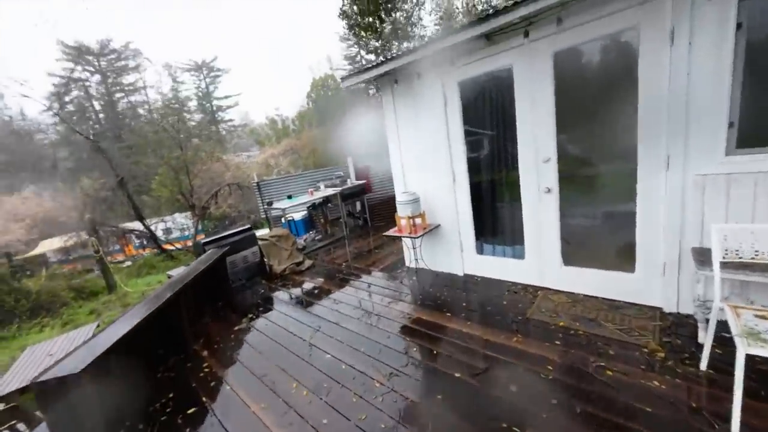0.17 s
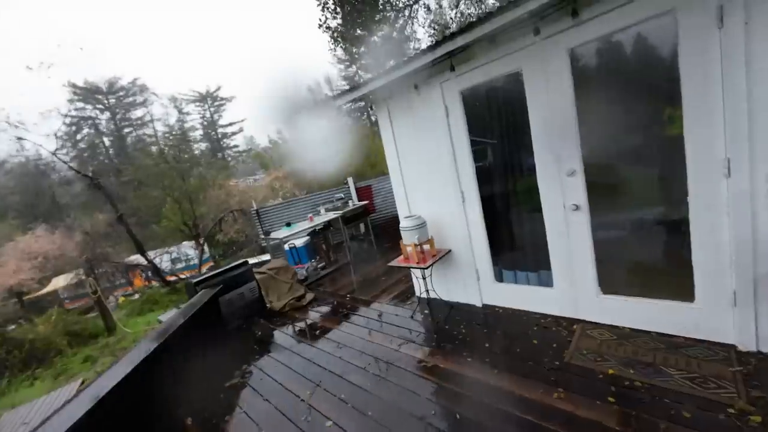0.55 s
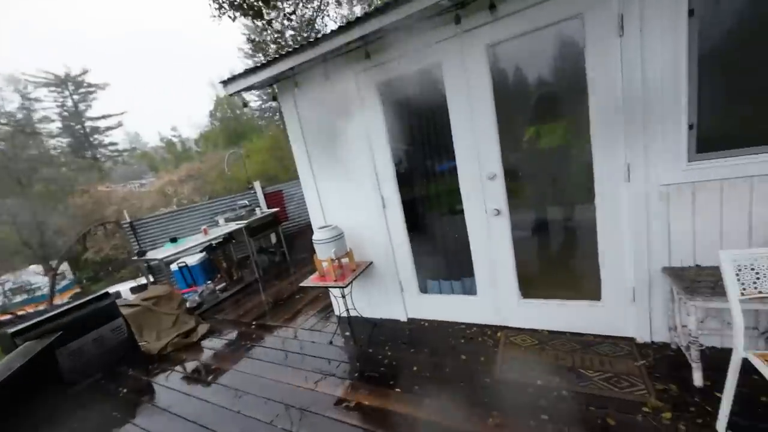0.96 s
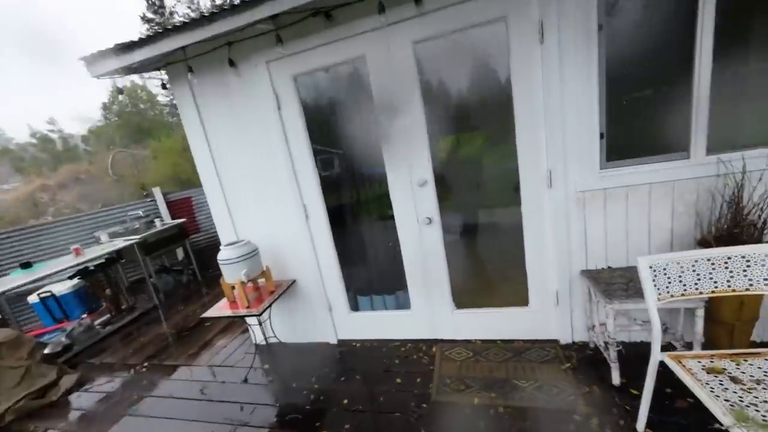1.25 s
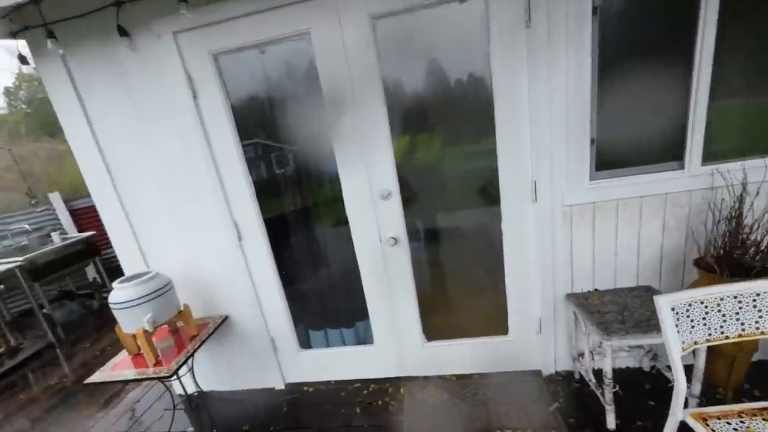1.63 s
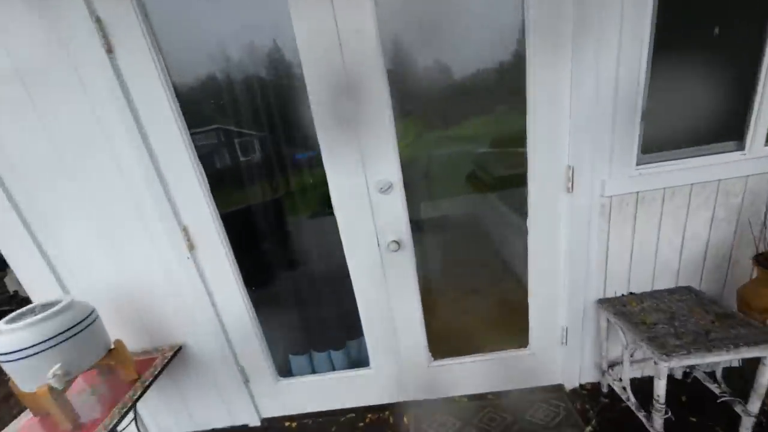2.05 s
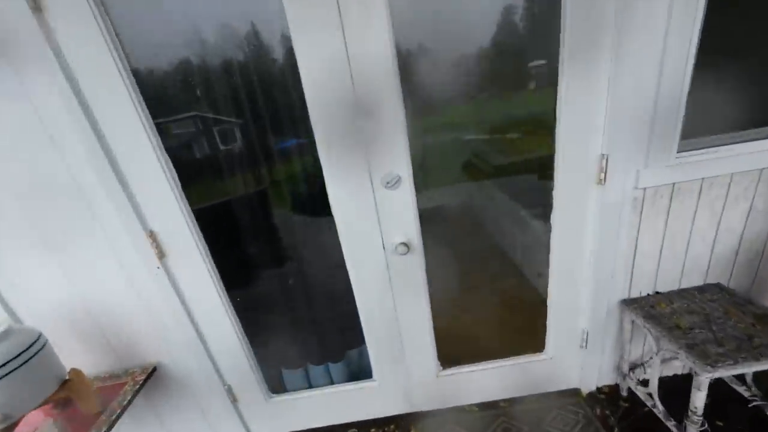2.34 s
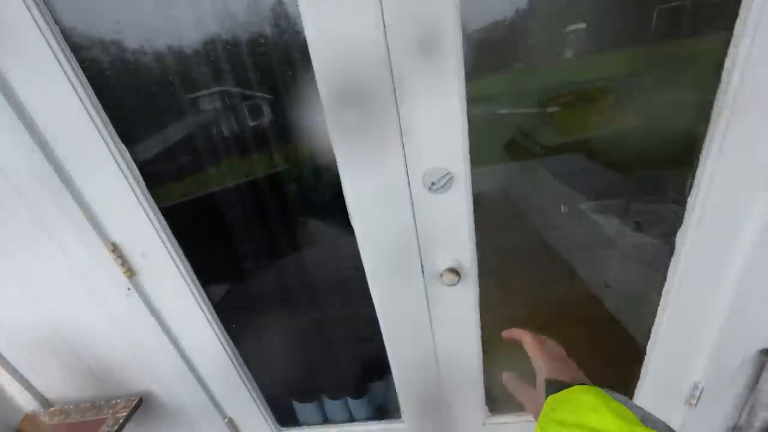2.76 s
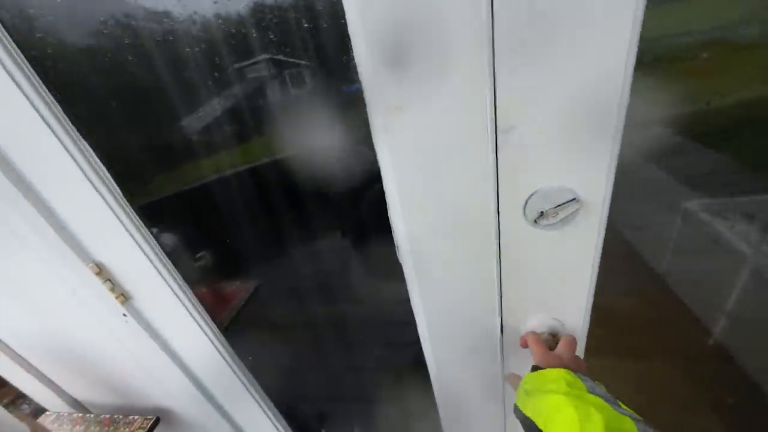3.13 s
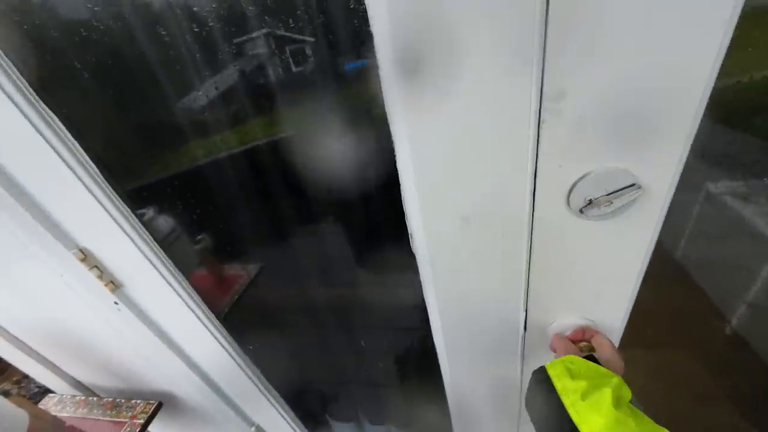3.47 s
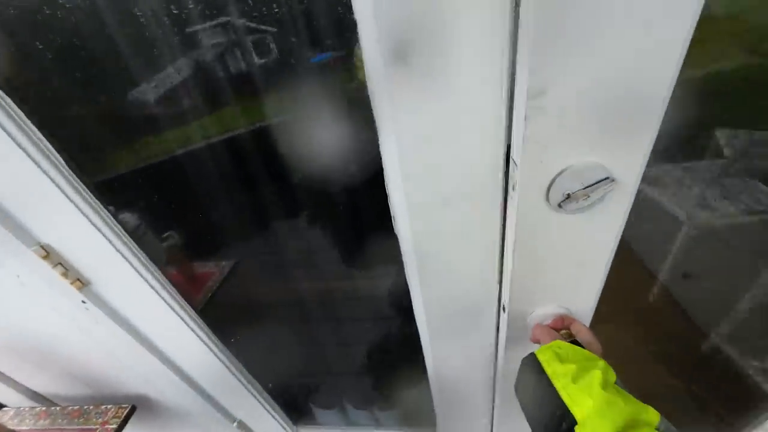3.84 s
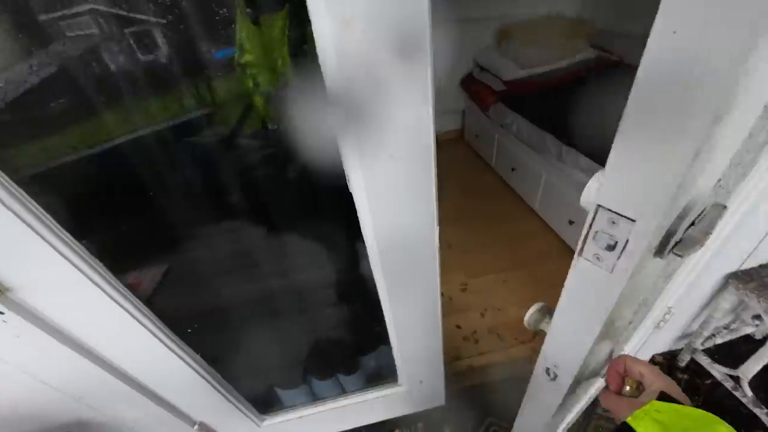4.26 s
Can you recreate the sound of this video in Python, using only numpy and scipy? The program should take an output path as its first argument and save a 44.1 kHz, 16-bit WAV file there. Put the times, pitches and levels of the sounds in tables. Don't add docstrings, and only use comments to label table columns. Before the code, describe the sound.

Rain hiss with a watery, muffled top end fills an open deck, close drops ticking at various pitches. Uneven low footfalls make the planks thud, with soft rubbing of sole and sleeve and gusty rumble on the moving microphone. The walker stops at a door; the latch clicks sharply, then the wood judders in quick slips and thuds as it opens.

```python
import sys
import numpy as np
from scipy import signal
from scipy.fft import rfft, irfft, next_fast_len
from scipy.io import wavfile
from scipy.ndimage import uniform_filter1d, map_coordinates

SR = 44100
rng = np.random.default_rng(int(sys.argv[2]) if len(sys.argv) > 2 else 0)


def wav_record(signal):
    frames = np.transpose(np.atleast_2d(signal))
    bounded = np.clip(frames, -1, 1)
    quanta = np.round(bounded * 32767).astype(np.int16)
    wavfile.write(sys.argv[1], SR, quanta)


def ratio_of_db(decibels):
    return 10 ** (np.asarray(decibels, float) / 20)


N = 194084


def unit(x):
    return x / np.sqrt(np.mean(x ** 2) + 1e-20)


def curves(rows):
    s, *cols = np.transpose(rows)
    return [np.interp(np.arange(N) / SR, s, c, left=-120) for c in cols]


def wobble(rate):
    knots = rng.standard_normal(int(N * rate / SR) + 4)
    return map_coordinates(knots, [np.arange(N) * rate / SR])


def swells(rows):
    t = np.arange(N) / SR
    power = 0
    for s, db, rise, fall in rows:
        power = power + ratio_of_db(2 * db - 20 * np.maximum((s - t) / abs(rise), (t - s) / abs(fall)))
    return np.sqrt(power)


def filtered(x, response):
    m = next_fast_len(N + 8192)
    return irfft(rfft(x, m) * response(np.fft.rfftfreq(m, 1 / SR)), m)[:N]


def coloured(x, spectrum):
    f, db = np.transpose(list(spectrum) + [(SR / 2, -140)])
    return unit(filtered(x, lambda hz: ratio_of_db(np.interp(np.log(hz + 1), np.log(f + 1), db))))


def resonated(x, modes):
    def response(f):
        total = 0
        for k, (centre, width, db) in enumerate(modes):
            band = 1j * f * width
            total = total + (-1) ** k * ratio_of_db(db) * band / (centre * centre - f * f + band)
        return total
    return unit(filtered(x, response))


def patchy(depth_db):
    z = signal.stft(rng.standard_normal(N + 512), nperseg=512)[2]
    field = uniform_filter1d(rng.standard_normal(z.shape), size=7, axis=0)
    field = uniform_filter1d(field, size=6, axis=1)
    return signal.istft(z * ratio_of_db(depth_db * unit(field)), nperseg=512)[1][:N]


def impacts(count, spread_db, life_s):
    at, size = rng.random((count, 2)).T
    energy = ratio_of_db(-2 * spread_db * np.log(1 - size * .995))
    hits = np.bincount((at * N).astype(int), energy, N)
    puff = np.exp(-2 * np.arange(900) / (SR * life_s))
    loudness = np.sqrt(np.abs(signal.fftconvolve(hits, puff)[:N]))
    return unit(loudness * rng.standard_normal(N))


def ring(t, hz, t60, attack):
    return -ratio_of_db(-60 * t / t60) * (1 - np.exp(-t / attack)) * np.sin(2 * np.pi * hz * t)


def add(track, s, sound):
    track[round(s * SR):][:len(sound)] += sound


def rain():
    # t/s, level/dB
    strength = [(0, -51), (.17, -55.5), (.3, -48.5), (.7, -51.5), (.91, -55), (1.2, -51.5), (1.4, -54.5),
                (1.7, -50.5), (2.1, -50.5), (2.45, -50.5), (2.7, -54), (2.9, -52.5), (3.13, -54.5),
                (3.45, -50), (3.7, -60.5), (3.82, -55), (3.99, -57), (4.2, -50.5)]
    # t/s, peak/dB, rise by 10 dB/s, fall by 10 dB/s
    flurries = [(.12, -48, 0.03, 0.09), (.709, -45, 0.08, 0.06), (.78, -48.5, 0.07, 0.17),
                (1.07, -42.5, 0.0982, 0.07), (1.3, -46.5, 0.06, 0.0739), (1.748, -43.5, 0.0473, 0.0148),
                (2.05, -48.5, 0.16, 0.1224), (2.481, -46, 0.0352, 0.02), (2.6, -46, 0.0559, 0.1),
                (2.75, -49.5, 0.04, 0.1), (2.84, -50, -0.02, 0.1), (2.916, -50, 0.09, 0.01),
                (2.99, -47, .03, 0.0445), (3.035, -46.5, .004, 0.0761), (3.165, -45, -0.0051, 0.0748),
                (3.465, -42, 0, 0.0444), (3.518, -43.5, 0.04, 0.0253), (3.71, -48, 0.1, -0.25),
                (4.031, -44.5, -0.0253, -0.04), (3.87, -46.5, 0.018, -0.1641)]
    # f/Hz, level/dB
    patter_tone = [(500, -34), (900, -2), (1600, -5), (2000, -4.5), (2500, -1), (3000, -2), (3400, -1.5),
                   (3800, -5.5), (4500, -6.5), (7000, -4.5), (12500, -4)]
    # f/Hz, level/dB
    board_tone = [(41, -38), (70, 4), (277, -2.5), (346, -3.5), (404, -4), (633, -8.5), (992, -10.5),
                  (2000, -19.5), (2600, -46), (4400, -120)]
    strength_db, = curves(strength)
    near = np.hypot(ratio_of_db(strength_db), swells(flurries))
    grains = 0.765 * patchy(depth_db=2.8) + 0.65 * impacts(count=1600, spread_db=3.0, life_s=0.0014)
    patter = near * ratio_of_db(-3.5 + 0.17 * wobble(25)) * coloured(grains, patter_tone)
    patter = patter + ratio_of_db(-57) * coloured(rng.standard_normal(N), patter_tone)

    drips = 0.81185 * patchy(depth_db=3.0) + 0.548 * impacts(count=350, spread_db=2.0, life_s=0.00642)
    drum = ratio_of_db(-49.5 + 0.29 * (strength_db - strength_db.mean()))
    boom = swells([(N / SR, -47, 0.397, 1)])
    return patter + np.hypot(drum, boom) * ratio_of_db(.8 * wobble(9)) * coloured(drips, board_tone)


def sway():
    # t/s, peak/dB, rise by 10 dB/s, fall by 10 dB/s
    gusts = [(0, -44.5, .05, 0.06), (.23, -40.5, 0.1, 0.1338), (.43, -42.5, 0.11, 0.01),
             (.6, -38.5, 0.09, 0.07), (.95, -45.5, 0.06, 0.04), (1.26, -56.5, 0.66, 0.93),
             (1.33, -37.5, -0.0223, 0.04), (1.5, -53.5, -0.4, 0.4), (2.06, -43, -0.0959, 0.14),
             (2.16, -38, 0.02, 0.21), (2.68, -38, 0.0237, 0.11), (3.22, -47, 0.31, 0.1),
             (3.48, -35.5, 0.0266, 0.1472), (3.7, -44.5, 0.14, 0.15), (3.8, -42.5, -0.0064, 0.06),
             (3.98, -37.5, 0.04, 0.0028), (4.2, -40.5, 0.2339, 0.22), (4.36, -31.5, 0.0246, 0.84)]
    # f/Hz, level/dB
    rumble_tone = [(12, -22), (25, -1.5), (50, -9), (80, -10.5), (140, -54.5)]
    calm_db = -59.5
    rumble = coloured(rng.standard_normal(N), rumble_tone)
    return np.hypot(ratio_of_db(calm_db), swells(gusts)) * unit(ratio_of_db(2.1923 * wobble(8.3)) * rumble)


def dull_knocks():
    # t/s, peak/dB, f/Hz
    knocks = [(.214, -35, 483), (0.2562, -35.5, 1100), (.202, -37, 200.5), (.247, -35.5, 500),
              (0.2552, -29.5, 407), (.261, -30, 300), (.285, -33, 390), (.2922, -24.5, 250),
              (.272, -36, 200), (.316, -37, 200), (0.2977, -28, 380), (.302, -37.5, 299),
              (.307, -27.5, 328), (.382, -37, 360), (.394, -35, 607), (.421, -32.5, 340), (.872, -41, 523),
              (.879, -39.5, 1050), (.887, -43, 600), (.955, -34.5, 220), (2.016, -44, 215),
              (2.128, -34.5, 258), (2.165, -41, 481), (2.175, -37.5, 350), (3.422, -36.5, 523),
              (3.498, -40.5, 580), (.785, -41, 1196), (.882, -43, 1355), (.927, -42, 1100),
              (1.2675, -34, 400), (1.268, -39.5, 947), (1.697, -37, 428), (2.16, -38, 420),
              (2.864, -31, 860), (2.981, -37, 479), (3.033, -38.5, 450), (.836, -39, 240),
              (2.876, -39.5, 502), (2.971, -38.5, 409), (2.997, -38, 520), (3.01, -37.5, 478),
              (3.022, -37.5, 560), (3.306, -45.5, 527.4), (3.366, -40.5, 538), (3.479, -34, 452),
              (3.591, -39, 930), (3.706, -39.5, 469), (3.9948, -40, 1092)]
    knock, t = np.zeros(N + SR), np.arange(SR // 16) / SR
    for s, db, hz in knocks:
        add(knock, s, ratio_of_db(db + 6.0) * ring(t, hz, 0.01153, 0.000727))
    return knock[:N]


def wet_ticks(rows, t60):
    track, t = np.zeros(N + SR), np.arange(SR // 16) / SR
    contact_s = 0.00017
    smack = -ratio_of_db(1) * (1 - t / contact_s) * np.exp(-t / contact_s)
    for s, db, hz in rows:
        smear = 1 + 0.41 * unit(uniform_filter1d(rng.standard_normal(len(t)), size=40))
        spatter = 0.17 * ratio_of_db(-60 * t / (2.2 * t60)) * np.diff(rng.standard_normal(len(t) + 1))
        add(track, s, ratio_of_db(db - 1.5) * (smear * ring(t, hz, t60, .0004) + spatter + smack))
    return track[:N]


def squelches():
    # t/s, peak/dB, f/Hz
    presses = [
        (.216, -42.5, 1250),
        (.2552, -32.5, 1271),
        (.2983, -31.5, 1255),
        (.308, -33.5, 1223),
    ]
    return wet_ticks(presses, t60=0.037)


def steps():
    # t/s, peak/dB, low mode f/Hz, upper mode level/dB, upper mode f/Hz
    footfalls = [(0.2298, -25.5, 103.6, -13.5, 195), (.385, -28, 96.8, -26, 200.9),
                 (1.365, -42, 151, -2.5, 194), (1.501, -37, 163.6, -7.5, 312.7),
                 (1.978, -29.5, 95.2, -5, 270.7), (1.995, -33.5, 110.5, -6, 258),
                 (2.155, -23.5, 101.1, -10.5, 272.2), (2.403, -38.5, 77.9, -20.5, 281),
                 (2.665, -23, 98.4, -11, 214.1), (3.4066, -21.5, 80.5, -4, 238.5),
                 (4.09, -28.5, 85.8, -3.5, 234.4)]
    # t/s, peak/dB, f/Hz, t60/s
    loose_boards = [
        (0.575, -44.5, 79.7, 0.246),
        (0.831, -28, 105.6, 0.1427),
        (0.834, -40, 218, 0.055),
        (0.951, -36.5, 109.9, 0.1124),
        (2.183, -41, 98, 0.25),
        (2.24, -47, 92, 0.6),
        (1.0, -47, 190, .1),
        (3.436, -42, 150, .15),
    ]
    deck, t = np.zeros(N + SR), np.arange(SR // 3) / SR
    stifle = ratio_of_db(-60 * (t / 0.0457) ** 3.05)
    for s, db, low_hz, upper_db, upper_hz in footfalls:
        add(deck, s + 0.00042, ratio_of_db(db + 3.5) * stifle * ring(t, low_hz, 0.309, 0.0065))
        add(deck, s + 0.003845, ratio_of_db(db + upper_db + 3.5) * stifle * ring(t, upper_hz, 0.1325, 0.00161))
    for s, db, hz, t60 in loose_boards:
        add(deck, s, ratio_of_db(db + 7) * ring(t, hz, t60, 0.46 / hz))
    return deck[:N]


def scuffs():
    # t/s, peak/dB, rise by 10 dB/s, fall by 10 dB/s
    scrapes = [(.258, -39, -0.01, .025), (.296, -40, 0.043, 0.0067), (.388, -42.5, 0.0527, 0.0345),
               (.58, -52.5, 0.05, 0.18), (.882, -40.5, -0.013, -0.0262), (.925, -50, -0.1039, 0.03),
               (.96, -50, -0.12, .04), (2.03, -50, 0.194, 0.16), (2.17, -44, -0.048, 0.04),
               (2.94, -47, 0.0276, -0.1), (2.98, -44, 0.0251, -0.0242), (3.01, -43.5, 0.0024, 0.0041),
               (3.44, -45, -0.0318, 0.67)]
    still_s = 3.55
    lateness = np.clip((np.arange(N) / SR - still_s) / .01, -50, 50)
    level = ratio_of_db(-1.5) * swells(scrapes) / (1 + np.exp(lateness))
    grit = impacts(count=1100, spread_db=1.0, life_s=0.00272)
    tone = [(80, -28.0), (150, -0.5), (500, -4.0), (900, -15.5), (1300, -14), (1900, -29.5)]
    return level * coloured(grit, tone)


def near_drops():
    # t/s, peak/dB, f/Hz
    drops = [(.2975, -38, 2440), (.3556, -32, 1610), (.4214, -38.5, 2004), (.4397, -36.5, 3030),
             (.4648, -35.5, 3340), (.7062, -33, 2320), (.956, -36.5, 3276), (1.051, -35.5, 2435),
             (1.0996, -38, 3135), (1.2974, -32.5, 2468), (1.336, -31, 2843), (1.372, -35, 3321),
             (1.476, -36, 2991), (1.5554, -38.5, 3264), (1.698, -37, 3235), (1.7454, -36.5, 3256),
             (2.0506, -35, 3360), (2.163, -37.5, 2056), (1.908, -41.5, 1880), (1.986, -40.5, 1800),
             (2.005, -40, 1780), (2.026, -38.5, 3203), (2.137, -44, 2000), (2.252, -41.5, 2635),
             (2.98, -39, 3020), (3.197, -39.5, 3530), (2.2184, -38.5, 3290), (2.3448, -38.5, 3255),
             (2.5875, -36, 3520), (2.8392, -38.5, 3200), (2.8645, -38, 1720), (2.9145, -36.5, 3296),
             (2.9905, -35.5, 3230), (3.034, -30.5, 2373), (3.061, -34.5, 2680), (3.066, -39, 3496),
             (3.164, -37, 3276), (3.241, -41, 2777), (1.303, -37.5, 1750),
             (3.4625, -33, 3247), (3.4966, -30.5, 2785), (3.515, -38, 2774), (3.582, -40, 3144),
                  (3.7084, -33.5, 1740), (3.8397, -44.5, 2347), (3.8676, -35, 2590), (3.9935, -36.5, 2066),
                  (4.017, -37.5, 3207), (4.068, -40, 2325), (4.1333, -40.5, 2262), (4.189, -43, 2221),
                  (4.2412, -35, 3304), (4.3817, -30.5, 1638), (4.3817, -38.5, 3280), (4.322, -38.5, 2497),
                  (4.357, -42.5, 2500), (4.391, -41, 2780)]
    return wet_ticks(drops, t60=0.013)


def splashes():
    # t/s, splash peak/dB, fine spray level/dB
    bursts = [(0.3815, -56, -72.5), (0.7058, -57, -79), (0.7786, -52, -83), (0.84, -53, -79),
              (0.9562, -58.5, -82), (1.3004, -49.5, -72), (1.3359, -50, -81), (1.3723, -62, -85),
              (1.476, -63, -89), (1.4945, -58, -89), (1.5414, -54.5, -77), (1.5549, -52.5, -85.5),
              (1.7439, -57.5, -79.5), (1.7764, -50, -80.5), (1.9555, -57.5, -85.5), (2.0028, -57, -83),
              (2.0208, -56.5, -85), (2.0497, -52.5, -82), (2.1196, -57.5, -86), (2.2179, -59, -85.5),
              (2.3007, -49.5, -80), (2.377, -57, -83), (2.4994, -64, -78), (2.5264, -61, -77.5),
              (2.5865, -50.5, -73), (2.6579, -60.5, -79), (2.8414, -50.5, -77.5), (2.8584, -60, -81.5),
              (2.9148, -54.5, -79), (2.9547, -57.5, -76.5), (2.9891, -50.5, -83), (3.033, -47, -75.5),
              (3.0604, -61, -85), (3.1961, -58, -86), (3.2365, -56, -82), (3.2904, -60.5, -82.5),
              (3.4057, -58.5, -85.5), (3.458, -54.5, -73), (3.4634, -54, -74.5), (3.5149, -57.5, -86),
              (3.8814, -61.5, -81), (3.9938, -59, -82.5), (4.0153, -54.5, -85), (4.0642, -55.5, -81.5),
              (4.1041, -54.5, -84), (4.1485, -56, -81), (4.1654, -61.5, -80), (4.2154, -57.5, -76.5),
              (4.2854, -58.5, -81.5), (4.3144, -54.5, -88)]
    # f/Hz, level/dB
    splash_tone = [(2500, -30), (4000, -3), (5500, -2), (7000, -1), (9000, -20)]
    # f/Hz, level/dB
    mist_tone = [(5500, -29.5), (7500, -2), (10000, -1.5), (12500, -1.5)]
    (splash, mist), t = np.zeros((2, N + SR)), np.arange(SR // 16) / SR
    for s, db, mist_db in bursts:
        add(splash, s, ratio_of_db(db + 9 - 60 * t / 0.0208) * rng.standard_normal(len(t)))
        add(mist, s, ratio_of_db(mist_db + 38 - 60 * t / 0.036) * rng.standard_normal(len(t)))
    bright = np.std(splash) * coloured(splash[:N], splash_tone)
    return bright + np.std(mist) * coloured(mist[:N], mist_tone)


def latch():
    click, t = np.zeros(N + SR), np.arange(400) / SR
    u = t / 0.000119
    push = u * (1 - 0.3 * u) * np.exp(-u)
    for s, db in [(3.7921, -11.5), (3.7932, -17)]:
        add(click, s, ratio_of_db(db) * (0.07 * ring(t, 2690, 0.0087, 0.0001837) - push))
    return click[:N]


def door():
    # t/s, level/dB
    pull = [
        (4.055, -64),
        (4.07, -46.5),
        (4.094, -48.5),
        (4.184, -42),
        (4.252, -29),
        (4.264, -27.5),
        (4.304, -44),
        (4.4, -40),
    ]
    # f/Hz, width/Hz, level/dB
    panel = [(263, 22, -5), (420, 143, -3.5), (489.7, 35, 1)]
    # f/Hz, width/Hz, level/dB
    edge = [(627, 39.6, 3), (712, 66, -5.5), (860, 88, -7.5)]
    # t/s, peak/dB, f/Hz, t60/s
    jolts = [(4.1025, -29, 82, 0.072), (4.134, -37.5, 598, 0.0218), (4.158, -36.5, 619, 0.0294),
             (4.181, -40, 797, 0.0205), (4.192, -37, 172, 0.036), (4.198, -35.5, 454, 0.031),
             (4.213, -30.5, 655.4, 0.0464), (4.2233, -33, 410, 0.029), (4.232, -27.5, 411, 0.0388),
             (4.241, -29.5, 214, 0.041), (4.2435, -24.5, 702, 0.034), (4.247, -28.5, 959, 0.0265),
             (4.247, -26.5, 538, 0.026), (4.253, -28, 539, 0.027), (4.259, -25, 135, 0.085),
             (4.26, -22.5, 444, .035), (4.2716, -23, 409, 0.029), (4.284, -29, 120, .06),
             (4.294, -36, 603, .03), (4.2944, -28.5, 112.3, 0.069), (4.309, -33.5, 453.4, .03),
             (4.312, -33, 166, 0.046), (4.33, -28, 95, 0.081), (4.3492, -20, 101.2, 0.082),
             (4.36, -29, 70, .1), (4.385, -25, 70, .1), (4.356, -32.5, 515, 0.039),
             (4.369, -34.5, 493, .03), (4.375, -34.5, 475, .03), (4.3755, -25, 120, .05),
             (4.382, -37.5, 495.6, .03)]
    # t/s, peak/dB, rise by 10 dB/s, fall by 10 dB/s
    puffs = [
        (4.094, -37.5, 0.03, 0.11),
        (4.27, -37.5, 0.06, 1.7),
        (4.4, -45, 0.21, -1.5),
    ]
    # t/s, peak/dB, rise by 10 dB/s, fall by 10 dB/s
    rubs = [
        (4.0, -55, -0.09, -0.38),
        (4.07, -49.5, 0.01, -0.28),
        (4.252, -46, 0.0343, -0.62),
        (4.322, -45.5, 0, -0.01),
        (4.385, -39.5, -0.0009, 1.63),
        (4.4, -45, 0.1359, 0.1),
    ]
    force_db, = curves(pull)
    free_s = 4.265
    edge_db = force_db - 249 * np.clip(np.arange(N) / SR - free_s, 0, .04)
    chatter = impacts(count=1500, spread_db=-0.5, life_s=0.0016)
    judder = ratio_of_db(force_db - 8.5) * resonated(chatter, panel)
    judder = judder + ratio_of_db(edge_db - 9.5) * resonated(chatter, edge)

    slips, t = np.zeros(N + SR), np.arange(SR // 8) / SR
    for s, db, hz, t60 in jolts:
        add(slips, s, ratio_of_db(db + 2.0) * ring(t, hz, t60, 0.48 / hz))

    push_tone = [(40, -50.5), (75, 0), (150, -2), (250, -16.0), (400, -39.5)]
    push = ratio_of_db(-7.5) * swells(puffs) * coloured(rng.standard_normal(N), push_tone)
    rub_tone = [(900, -16), (1500, -1.0), (3200, -3.0), (5500, -7.0), (8000, -20.0), (12000, -36)]
    grains = impacts(count=2400, spread_db=1.0, life_s=0.0078)
    rub = ratio_of_db(-4.5) * swells(rubs) * coloured(grains, rub_tone)
    return judder + slips[:N] + push + rub


def scene():
    weather = rain() + sway()
    walker = squelches() + steps() + scuffs()
    water = dull_knocks() + near_drops() + splashes()
    return (weather + walker + water + latch() + door())[None]


def roll_off(x):
    return signal.sosfilt(signal.butter(12, 12726, fs=SR, output="sos"), x)


def record(dry):
    def port(hz):
        return 1 / (1 - (hz / 3300) ** 2 + 1j * hz / 4200) ** 2
    muffled = filtered(dry[0], port)
    return roll_off(muffled[None])


dry = scene()
out = record(dry)
wav_record(out)
```